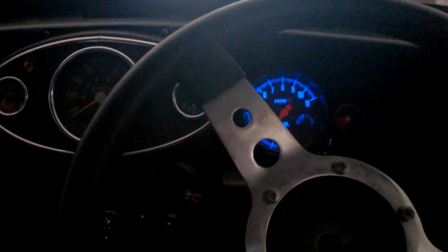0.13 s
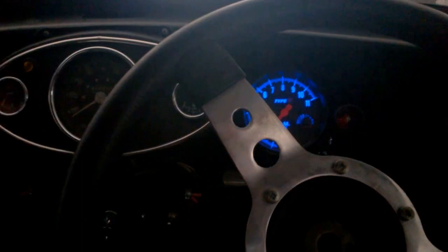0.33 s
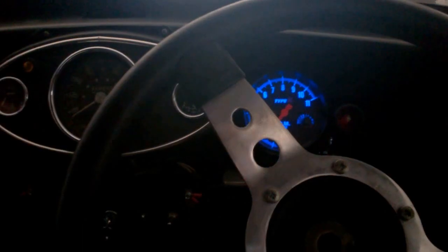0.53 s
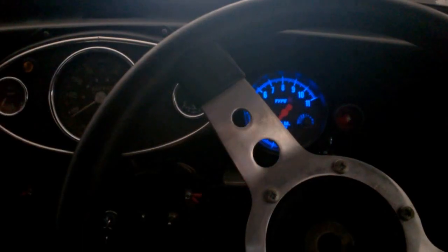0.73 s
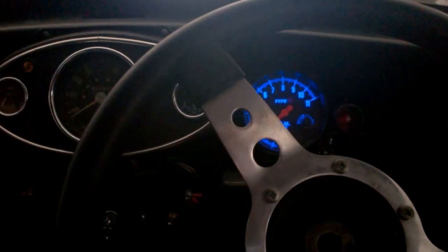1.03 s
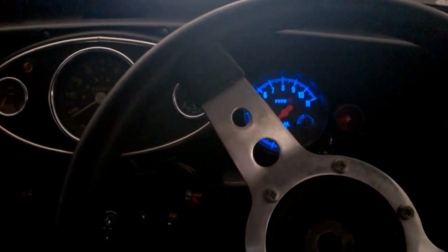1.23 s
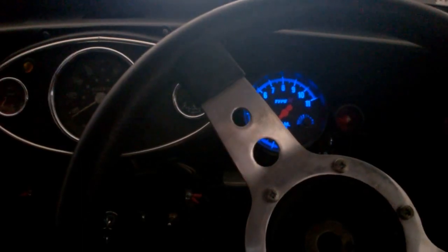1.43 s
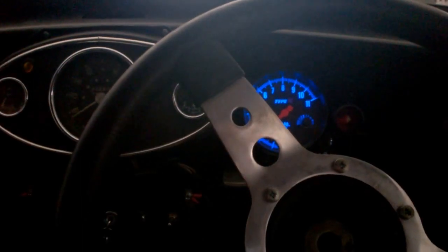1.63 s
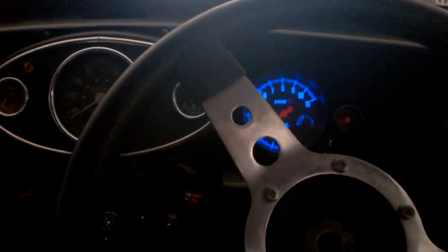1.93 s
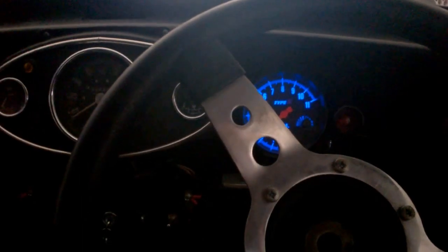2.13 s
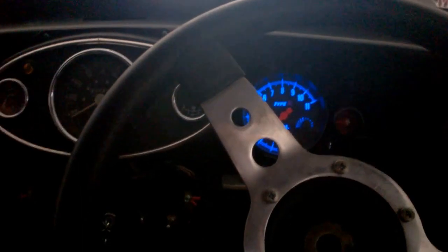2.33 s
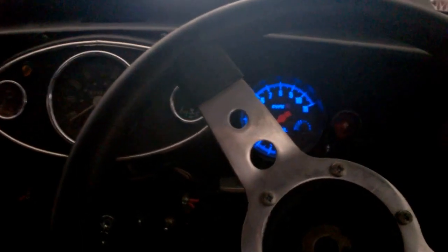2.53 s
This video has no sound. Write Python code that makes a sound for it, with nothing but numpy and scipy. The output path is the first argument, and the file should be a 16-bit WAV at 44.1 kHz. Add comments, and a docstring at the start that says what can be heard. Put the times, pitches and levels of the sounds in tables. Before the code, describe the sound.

A booming four-cylinder car engine is revved three times, heard from inside the cabin

```python
"""A booming four-cylinder car engine, heard from the driver's seat, is revved up three times.
It falls back toward idle before each; the third rise dips briefly, then climbs on to the end.
The boom is a harmonic series of shaft orders; each firing also rings the cabin and pipe resonances.
Intake roar, valve clatter, bass rumble and hiss are filtered noise, most of it pulsed by the firings.
Loose trim buzzes and a part hums at listed moments, as noise taps ringing decaying modes."""
import sys
import numpy as np
from scipy import signal
from scipy.fft import rfft, irfft, next_fast_len
from scipy.io import wavfile
from scipy.ndimage import uniform_filter1d, map_coordinates

SR = 44100
rng = np.random.default_rng(int(sys.argv[2]) if len(sys.argv) > 2 else 0)


def materialize(psi):
    """Save the field psi as 16-bit PCM at rate SR to the path in sys.argv[1].

    A 1-D psi becomes a single channel; in a 2-D psi each row is a channel.
    """
    bounded = np.clip(np.atleast_2d(psi).T, -1, 1)
    quanta = np.round(bounded * 32767).astype(np.int16)
    wavfile.write(sys.argv[1], SR, quanta)


def amplitude_ratio(level_db):
    """Convert a level in decibels to the matching linear amplitude (field) ratio."""
    exponent = np.asarray(level_db, float) / 20
    return 10 ** exponent


N = 117747  # samples


def unit(x):
    """Normalisation: scales a signal to rms 1."""
    return x / np.sqrt(np.mean(x ** 2) + 1e-20)


def along(points, hz):
    """Spectral envelope: straight lines between (hz, db) points on a log frequency axis."""
    point_hz, value = np.transpose(points)
    return np.interp(np.log(hz + 1), np.log(point_hz + 1), value)


def curves(rows):
    """Linear interpolation: one value per sample for each column after the time."""
    time_s, *columns = np.transpose(rows)
    return [np.interp(np.arange(N) / SR, time_s, column) for column in columns]


def wobble(rate_hz):
    """Slow random modulation: a smooth curve through rate_hz random knots a second."""
    return map_coordinates(rng.standard_normal(400), [np.arange(N) * rate_hz / SR])


def bumps(rows, width_s):
    """Gaussian envelopes: a sum of bells, each row giving centre_s and height."""
    t = np.arange(N) / SR
    return sum(height * np.exp(-((t - centre_s) / width_s) ** 2) for centre_s, height in rows)


def filtered(x, response):
    """Linear filtering: the spectrum of x times a response of frequency."""
    size = next_fast_len(N + SR // 2)
    return irfft(rfft(x, size) * response(np.fft.rfftfreq(size, 1 / SR)), size)[:N]


def shaped_noise(noise, envelope):
    """Coloured noise: a spectral envelope in dB imposed on noise, at rms 1."""
    return unit(filtered(noise, lambda hz: amplitude_ratio(along(envelope, hz))))


def gate(cycles, sharp):
    """Amplitude modulation: a sudden, decaying puff per cycle, each of its own size."""
    size = amplitude_ratio(1.1 * rng.standard_normal(400))[cycles.astype(int) % 400]
    return size * np.exp(-sharp * (cycles % 1))


# engine speed and strong orders: time_s, shaft_hz, order_2_db, order_3_db, order_4_db
CRANK_SPEED = [(0.1, 39.33, -19.5, -17, -17.5), (0.2, 36.2, -22.5, -39.5, -28),
               (0.33, 30.72, -10.5, -44, -29.5), (0.49, 26.25, -12.5, -34, -29.5),
               (0.59, 27.36, -12, -32, -17.5), (0.63, 29.47, -13.5, -57, -20),
               (0.75, 35.49, -12.5, -29.5, -17), (0.9, 44.29, -24, -19.5, -23),
               (1.11, 35.66, -18.5, -25.5, -27), (1.18, 33.1, -11, -36, -20.5),
               (1.27, 30.3, -11.5, -29, -32), (1.33, 27.82, -13, -19.5, -31),
               (1.54, 34.54, -14, -35.5, -17), (1.72, 49.17, -32, -7, -32), (1.79, 48.42, -24, -25, -56),
               (2.04, 36.1, -20.5, -27.5, -55), (2.1, 32.97, -9, -49, -21.5),
               (2.26, 26.04, -14, -32, -27.5), (2.35, 34.08, -15, -48, -16.5), (2.42, 43.19, -44, -20, -35),
               (2.49, 48.56, -40, -12, -27), (2.56, 46.02, -41, -42, -19), (2.62, 52.32, -20.5, -23, -39),
               (2.66, 57.1, -15.5, -21, -17.5)]
# loudness courses that the noise layers follow: time_s, roar_db, low_treble_db, high_treble_db
THROTTLE_COURSE = [(0.1, -27.5, -43.5, -58), (0.4, -34, -52, -67), (0.5, -32.5, -45.5, -60),
                   (0.71, -27.5, -39, -57.5), (0.78, -23, -41.5, -56.5), (1.09, -32.5, -39.5, -59.5),
                   (1.14, -29.5, -43.5, -56.5), (1.23, -34.5, -50, -66.5), (1.53, -28, -46.5, -59.5),
                   (1.59, -23, -40.5, -54.5), (1.61, -19.5, -48, -55.5), (1.72, -23, -37.5, -55.5),
                   (1.8, -28.5, -43.5, -64.5), (1.95, -33, -43, -60.5), (2.06, -36.5, -41.5, -63.5),
                   (2.12, -38.5, -49, -69), (2.22, -35.5, -52, -65), (2.28, -25.5, -35, -57.5),
                   (2.36, -22, -41, -56.5), (2.43, -19, -43, -52), (2.56, -29.5, -42, -63.5),
                   (2.6, -18.5, -30.5, -49.5), (2.66, -18, -46, -52.5)]


def crank():
    """Phase is the integral of frequency: a four-cylinder fires twice per shaft turn."""
    shaft_hz, *orders_db = curves(CRANK_SPEED)
    firing_hz = 2 * uniform_filter1d(shaft_hz, size=1500)
    firing_count = np.cumsum(firing_hz) / SR
    return firing_count, orders_db, *curves(THROTTLE_COURSE)


# relative spectrum of the air hiss: pitch_hz, level_db
HISS_SPECTRUM = [(2500, -20.5), (4500, 3.5), (6500, -2), (8500, -0.5), (15700, -11)]


def hiss(firing_count, high_db):
    """Broadband noise: fine air hiss, lightly pulsed, flickering in patches of pitch and time."""
    air = rng.standard_normal(N) * (7.4 + unit(gate(firing_count, sharp=2.3)))
    bins = signal.stft(air, nperseg=512)[2]
    patches = uniform_filter1d(rng.standard_normal(bins.shape), size=40, axis=0)
    patches = uniform_filter1d(patches, size=8, axis=1)
    patch_db = 1 * unit(patches)
    air = signal.istft(bins * amplitude_ratio(patch_db), nperseg=512)[1][:N]
    return shaped_noise(air, HISS_SPECTRUM) * amplitude_ratio(high_db + 0.84)


# relative spectrum of the drumming body and exhaust: pitch_hz, level_db
RUMBLE_SPECTRUM = [(14, -32.5), (31, 7.5), (44, -5), (64, 10.5), (96, -5), (130, 7.5), (190, 2),
                   (300, -30.5), (1000, -88.5)]


def rumble(roar_db):
    """Low-frequency radiation: body and exhaust drum in the bass, growing little with the throttle."""
    noise = shaped_noise(rng.standard_normal(N), RUMBLE_SPECTRUM)
    return noise * amplitude_ratio(-24 + 0.29 * (roar_db + 36.5) + 1.2 * wobble(9.99))


def chatter(firing_count, events, width_s, modes):
    """Modal excitation: noise taps in step with the firings ring a part's decaying modes."""
    t = np.arange(SR // 8) / SR
    shake = bumps([(centre_s, amplitude_ratio(db)) for centre_s, db in events], width_s)
    taps = unit(rng.standard_normal(N) * (1.5 + unit(gate(firing_count, sharp=5.1)))) * shake
    ring = sum(amplitude_ratio(db - 60 * t / t60_s) * np.sin(2 * np.pi * hz * t) for hz, db, t60_s in modes)
    return signal.fftconvolve(taps, ring / np.linalg.norm(ring))[:N]


# a part humming near idle: centre_s, level_db
HUM_EVENTS = [(.5, -47.5), (1.4, -50.5), (2.22, -50.5)]
# its mode: pitch_hz, relative level_db, t60_s
HUM_RING = [(2643, 0.1, 0.019)]


def hum(firing_count):
    """Single-mode resonance: a part hums briefly near idle."""
    return chatter(firing_count, HUM_EVENTS, .05, HUM_RING)


# trim buzzing as the firing rate passes about 70 a second: centre_s, level_db
BUZZ_EVENTS = [(0.073, -42), (0.271, -48), (0.801, -41.5), (1.131, -43.5), (1.588, -43), (2.065, -43),
               (2.379, -43.5)]
# its modes: pitch_hz, relative level_db, t60_s
BUZZ_RING = [(2390, 3, .045), (4120, -8, .035), (4450, -8, .035), (6950, -15, .03)]


def buzz(firing_count):
    """Multi-mode resonance: loose trim buzzes at the listed moments."""
    return chatter(firing_count, BUZZ_EVENTS, .036, BUZZ_RING)


# relative spectrum of the valve gear: pitch_hz, level_db
VALVE_SPECTRUM = [(150, -39), (300, -12.5), (800, -4), (1500, -14.5), (2500, -17), (3500, -26.5),
                  (5000, -39), (9000, -76.5)]


def valves(firing_count, treble_db):
    """Impact noise: mechanical hash of the valve gear, pulsed twice per firing."""
    clatter = rng.standard_normal(N) * (3.2 + unit(gate(2 * firing_count, sharp=1.4)))
    noise = shaped_noise(clatter, VALVE_SPECTRUM)
    return noise * amplitude_ratio(-37.5 + 0.63 * (treble_db + 46) + 1.24 * wobble(12))


# relative spectrum of the intake air: pitch_hz, level_db
ROAR_SPECTRUM = [(150, -42), (250, -3), (500, -4), (1000, -9), (1500, -9), (2200, -19), (3200, -38),
                 (5000, -43.5), (9000, -87)]
# intake resonances: pitch_hz, width_hz, boost_db
INTAKE_RESONANCES = [(234.5, 12, 16), (432.5, 93, 5.5), (854, 83, 9), (1024, 130, 5.5), (1122, 21, 6),
                     (1290, 24, 0), (1451, 110, 6)]


def roar(firing_count, roar_db):
    """Flow noise: intake air, partly in puffs, is coloured by the intake resonances."""
    pulsed_share = 0.2
    puffs = unit(gate(firing_count, sharp=1.2))
    air = rng.standard_normal(N) * (1 - pulsed_share + pulsed_share * puffs)

    def intake(hz):
        """Resonant gain: peaks in dB added to the spectral envelope."""
        boost_db = sum(db / (1 + ((hz - centre_hz) / width_hz * 2) ** 2)
                       for centre_hz, width_hz, db in INTAKE_RESONANCES)
        return amplitude_ratio(along(ROAR_SPECTRUM, hz) + boost_db)

    noise = unit(filtered(air, intake))
    return noise * amplitude_ratio(-33 + 1.495 * (roar_db + 29.5) + 1.3 * wobble(22.0))


# cabin and pipe resonances rung by each firing: pitch_hz, width_hz, relative level_db
PIPE_RESONANCES = [(132, 5.7, -2), (235.9, 5.1, 8.5), (322.4, 31.7, -1.5), (426.8, 22.5, -5),
                   (504.5, 7.7, -1.5), (1106, 34, -22.5), (1456, 29, -32)]


def firing_pulses(firing_count, roar_db):
    """Impulse response: one uneven pulse per firing rings the cabin and pipe."""
    jitter_periods, scatter_db = 0.021, 4
    chance = rng.standard_normal((int(firing_count[-1]), 2))
    moments = np.arange(len(chance)) + .5 + jitter_periods * chance[:, 0]
    at = np.searchsorted(firing_count, moments).clip(0, N - 1)
    pulses = np.bincount(at, amplitude_ratio(scatter_db * chance[:, 1]), N)

    def ring(hz):
        """Parallel band-pass resonators of alternating sign."""
        return sum((-1) ** k * amplitude_ratio(db) * 1j * hz * width_hz / (mode_hz ** 2 - hz ** 2 + 1j * hz * width_hz)
                   for k, (mode_hz, width_hz, db) in enumerate(PIPE_RESONANCES))

    level = amplitude_ratio(-27.5 + 0.79 * (roar_db + 25.5))
    return filtered(pulses * level, ring) / np.std(filtered(pulses, ring))


# weak firings, where the strong orders stumble: centre_s, depth_db
WEAK_FIRINGS = [(.44, -26), (.53, -16), (1.36, -6.5)]
# weaker shaft orders: multiple of the shaft rate, level_db before cabin gain and throttle
WEAK_ORDERS = [(1.0, -24.5), (2.5, -18.5), (5.0, -20.5), (6.0, -19), (7.0, -21), (8.0, -22)]
# cabin resonances that colour the weaker orders: pitch_hz, width_hz, peak_gain_db
CABIN_RESONANCES = [(29, 14, 9), (63.3, 13, -0.5), (187.6, 19.7, -0.3), (240, 18, -3)]


def boom(firing_count, orders_db, roar_db):
    """Harmonic series: each shaft order is an unsteady tone; the three strong ones stay in step."""
    shaft_turns = firing_count / 2 + 0.029 * wobble(9.1)
    out = 0
    for order, db in enumerate(orders_db, start=2):
        out = out + amplitude_ratio(db + 1.13 * wobble(15)) * np.cos(2 * np.pi * order * shaft_turns)
    out = out * amplitude_ratio(bumps(WEAK_FIRINGS, 0.0073))
    shaft_hz = np.gradient(firing_count) * SR / 2
    for order, db in WEAK_ORDERS:
        cabin_gain = sum(amplitude_ratio(peak_db) / (1 + (2 * (order * shaft_hz - hz) / width_hz) ** 2)
                         for hz, width_hz, peak_db in CABIN_RESONANCES)
        level_db = db + 0.71 * (roar_db + 25) + 2.5 * wobble(13)
        phase_turns = order * shaft_turns + rng.random() + 0.039 * wobble(12)
        out += cabin_gain * amplitude_ratio(level_db) * np.sin(2 * np.pi * phase_turns)
    return 2 ** .5 * out  # so that a tone's level is its rms


def scene():
    """Superposition: the layers, led by the crank and throttle courses, add up."""
    firing_count, orders_db, roar_db, low_db, high_db = crank()
    air = hiss(firing_count, high_db) + roar(firing_count, roar_db)
    parts = hum(firing_count) + buzz(firing_count) + valves(firing_count, low_db)
    engine = rumble(roar_db) + firing_pulses(firing_count, roar_db) + boom(firing_count, orders_db, roar_db)
    return (air + parts + engine)[None]


def low_pass(x):
    """Removes everything above the highest recorded frequency."""
    return signal.sosfilt(signal.butter(12, 15720, fs=SR, output="sos"), x)


def record(dry):
    """Soft saturation: peaks are rounded off; the sound begins after a short silence."""
    ceiling, hardness, start_s = .71, 6, .0565
    mix = dry / (1 + np.abs(dry / ceiling) ** hardness) ** (1 / hardness)
    mix = mix * (np.arange(N) >= start_s * SR)
    return low_pass(mix)


dry = scene()
out = record(dry)
materialize(out)
```